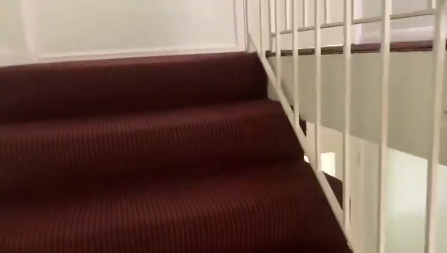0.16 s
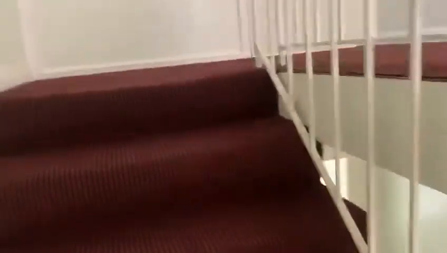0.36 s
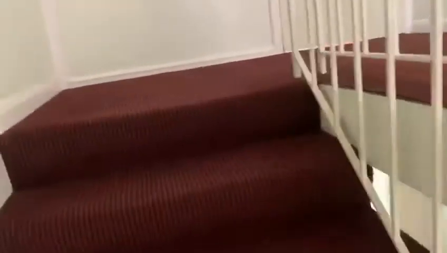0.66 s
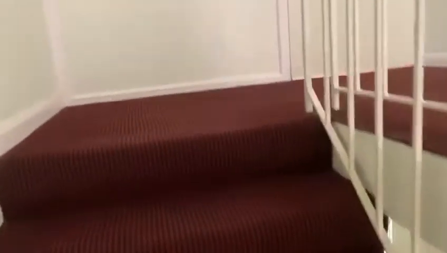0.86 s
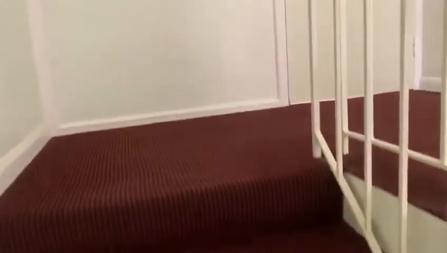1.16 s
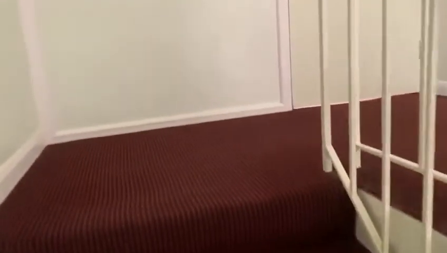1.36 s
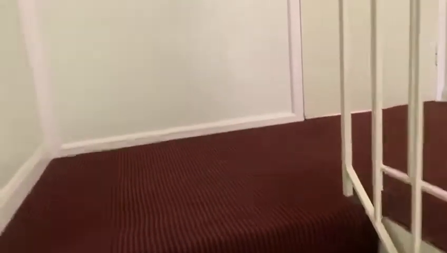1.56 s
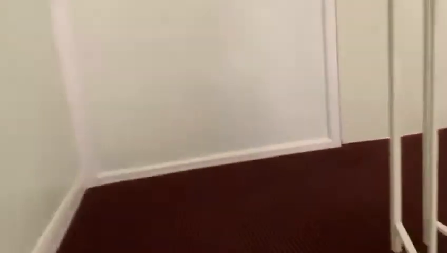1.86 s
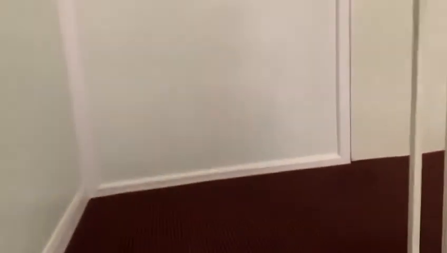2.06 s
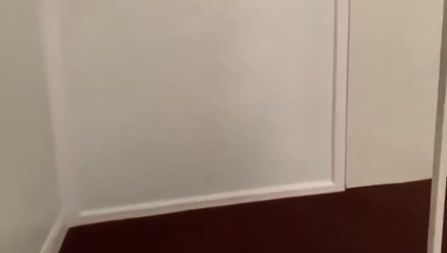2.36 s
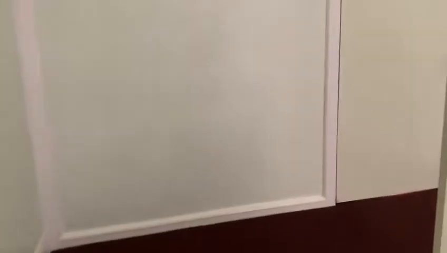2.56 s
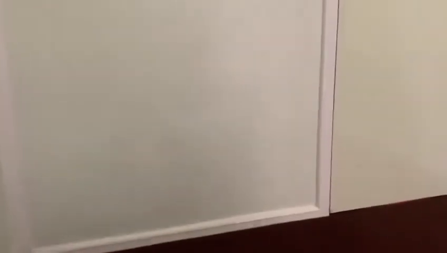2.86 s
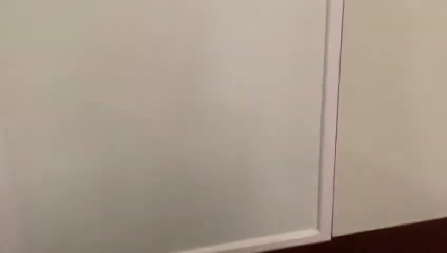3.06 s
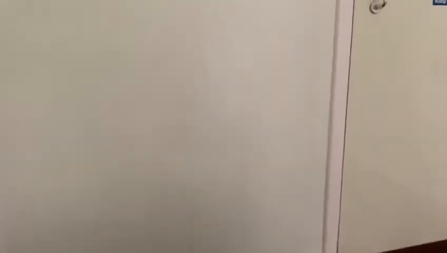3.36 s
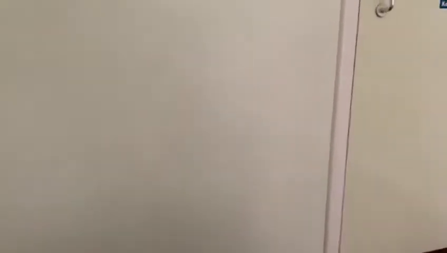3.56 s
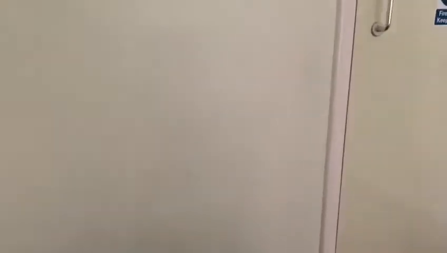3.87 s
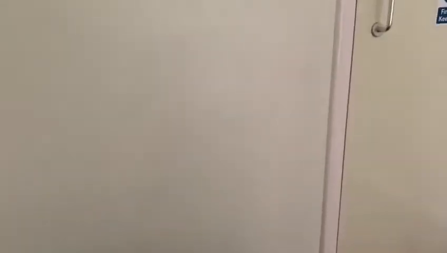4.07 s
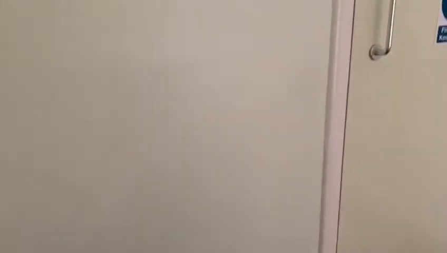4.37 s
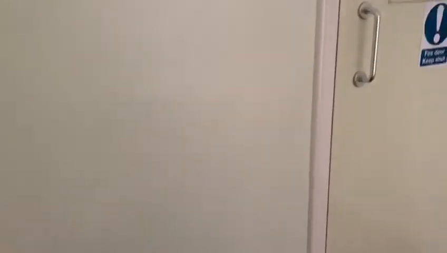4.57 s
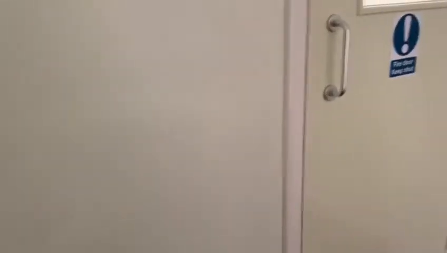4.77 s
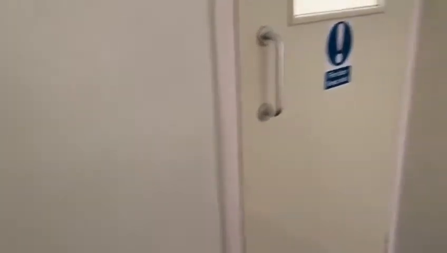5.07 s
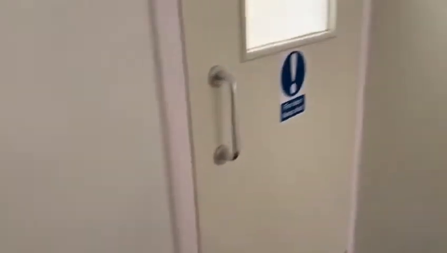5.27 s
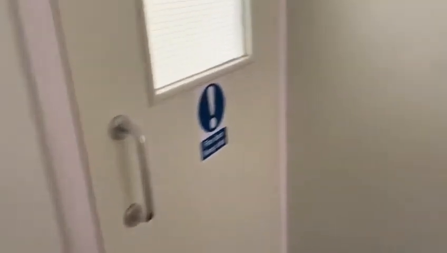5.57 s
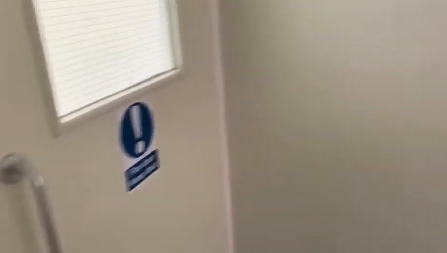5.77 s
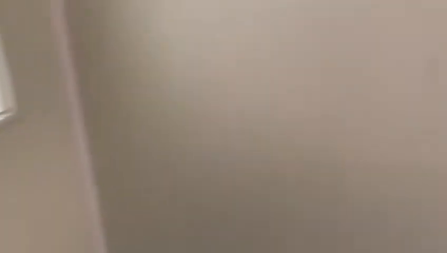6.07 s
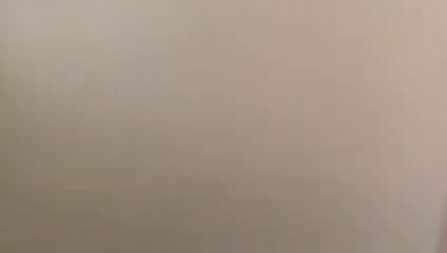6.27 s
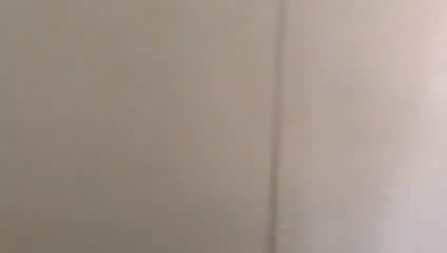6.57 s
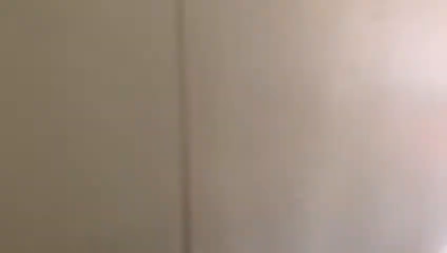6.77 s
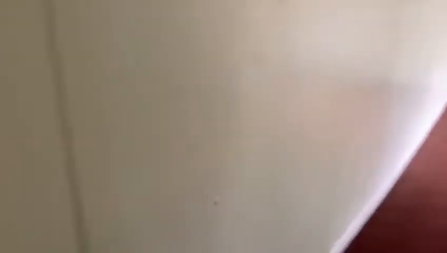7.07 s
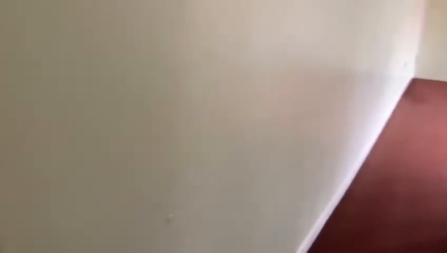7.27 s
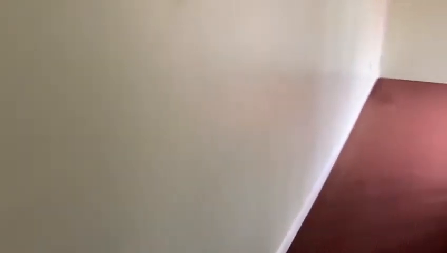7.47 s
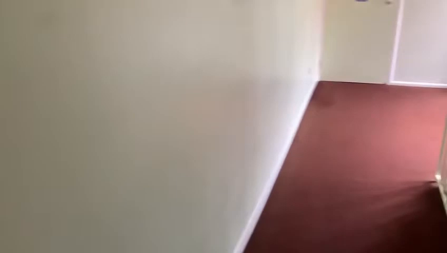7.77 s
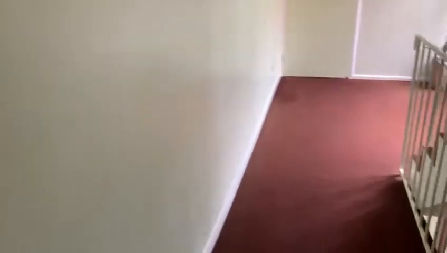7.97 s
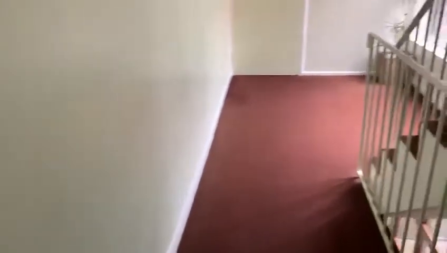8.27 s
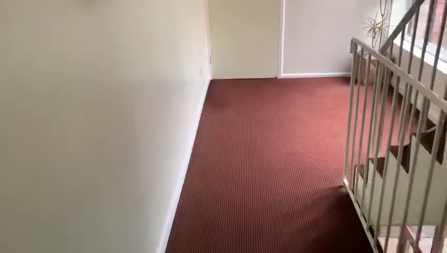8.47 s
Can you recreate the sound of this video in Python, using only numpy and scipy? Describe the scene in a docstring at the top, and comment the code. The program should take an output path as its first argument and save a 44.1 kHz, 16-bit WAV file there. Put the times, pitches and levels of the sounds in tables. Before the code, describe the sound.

In a quiet, hard-walled stairwell, dull carpeted footsteps climb the last stairs and make the flight boom low. Close to the handheld stereo microphone, clothing swishes and folds snap, with a tiny zip pull tinkling. On the landing the boom fades and softer, drier steps continue among rustles, with faint finger bumps near six seconds.

```python
"""A hard-walled stairwell, heard through two microphone ports carried in the walker's hand; it rumbles faintly.
First the last carpeted stairs: dull footfalls set the flight booming, while close by clothes swish,
folds snap taut and a zip pull tinkles. Then the feet reach the solid landing, where the boom drops away
and the knock of the soles rises against the thud. Later fingers bump the case softly, and the zip ticks again.
Blows ring decaying modes, cloth is coloured random grains, and the walls add a decaying noise tail."""
import sys
import numpy as np
from scipy import signal
from scipy.fft import rfft, irfft, next_fast_len
from scipy.io import wavfile
from scipy.ndimage import map_coordinates

SR = 44100
rng = np.random.default_rng(int(sys.argv[2]) if len(sys.argv) > 2 else 0)


def bounce(signal):
    """Save signal as a 16-bit WAV file at the path given by the first command-line argument."""
    frames = np.transpose(np.atleast_2d(signal))
    limited = np.clip(frames, -1, 1)
    pcm = np.round(limited * 32767).astype(np.int16)
    wavfile.write(sys.argv[1], SR, pcm)


N = 380583
TIME = np.arange(N) / SR
SPAN = TIME[:SR // 2]   # the half second that one event may take
SPAN_MIDDLE_S = SPAN.mean()
SIDES = np.array([[1], [-1]])   # left, right


def from_db(db):
    """Decibels to gain."""
    return 10 ** (np.asarray(db) / 20)


def rms_one(x):
    """Scale to unit power."""
    return x / np.sqrt(np.mean(x ** 2) + 1e-20)


def add(out, sound, s):
    """Mix a sound in from time s on."""
    start = max(int(s * SR), 0)
    out[:, start:start + sound.shape[-1]] += sound[..., :N - start]


def bins(size):
    """Spectrum frequencies in Hz, raised by 1 Hz so that their logarithm exists."""
    return np.arange(size // 2 + 1) * SR / size + 1


def at_hz(points, hz):
    """Read a two-column table over log frequency."""
    table_hz, value = np.transpose(points)
    return np.interp(np.log(hz), np.log(table_hz), value)


def colour(x, spectrum):
    """Give white sound a spectrum and keep its power."""
    size = x.shape[-1]
    gain = rms_one(from_db(at_hz(spectrum, bins(size))))
    return irfft(rfft(x) * gain, size)


def wander(along):
    """Smooth chance with a spread near one and a new value for each unit along the axis."""
    knots = np.clip(rng.standard_normal(512), -2, 2)
    return np.interp(along, np.arange(len(knots)), knots)


def grains(per_s, spread_db):
    """Random tiny slips of uneven size through one event; unit power."""
    slips = rng.random(len(SPAN)) < per_s / SR
    size = np.clip(rng.standard_normal(len(SPAN)), -2, 2)
    sign = rng.choice([-1, 1], len(SPAN))
    return rms_one(slips * sign * from_db(spread_db * size))


def burst(rise_s, fall_s):
    """An envelope that swells quickly and dies away."""
    rise = np.minimum(SPAN / rise_s, 1) ** 2
    return rise * np.exp(-np.maximum(SPAN - rise_s, 0) / fall_s)


def strike(times, levels_db, modes):
    """Blows ring a body's damped modes, each with a random strength of its own."""
    out = np.zeros(N)
    for hz, db, t60_s in modes:
        clicks = np.full(N, 1e-18)
        clicks[(times * SR).astype(int)] = from_db(levels_db + db + rng.standard_normal(len(times)))
        radius = np.exp(-np.log(1000) / (t60_s * SR))
        angle = 2 * np.pi * hz / SR
        resonator = [1, -2 * radius * np.cos(angle), radius * radius]
        out += signal.lfilter([0, np.sin(angle)], resonator, clicks)
    return out


def ports(x, lead_s, pan_db):
    """A near sound reaches the left port lead_s before the right, and pan_db louder there."""
    turn = np.exp(1j * np.pi * bins(len(x)) * lead_s * SIDES)
    return irfft(rfft(x) * turn, len(x)) * from_db(.5 * pan_db * SIDES)


# likeness of the two ports in sound from all sides: frequency_hz, correlation (none)
PORT_LIKENESS = [(60, 0.96), (130, 0.76), (260, 0.79), (500, 0.24), (1000, 0.02)]


def diffuse(size):
    """White sound from all sides: both ports agree only in the bass."""
    alike = np.clip(at_hz(PORT_LIKENESS, bins(size)), -1, 1)
    mid, side = rfft(rng.standard_normal((2, size)))
    return irfft(np.sqrt((1 + alike) / 2) * mid + np.sqrt((1 - alike) / 2) * side * SIDES, size)


# echo of the stairwell: frequency_hz, t60_s
STAIRWELL_DECAY = [(100, 0.94), (300, 0.5), (700, 0.16), (3000, 0.41), (10000, 0.2)]


def stairwell(x, room_db, build_s=0.0016):
    """Add the echo tail of the hard walls, which dies at its own rate in each octave."""
    noise, t, tail = rfft(diffuse(SR)), TIME[:SR], 0
    octave = np.clip(np.log2(bins(SR)), 6, 14)
    for k in range(6, 15):   # bands centred on 2 ** k Hz
        band = irfft(noise * np.maximum(1 - abs(octave - k), 0), SR)
        tail = tail + band * np.exp(-np.log(1000) * t / at_hz(STAIRWELL_DECAY, 2 ** k))
    build = 1 - np.exp(-t / build_s)
    tail = rms_one(tail * build) / np.sqrt(SR)
    return x + from_db(room_db) * signal.fftconvolve(x, tail, axes=1)[:, :N]


# background, before layer gains: time_s, rumble_db, hollow_murmur_db
BACKGROUND = [(0, -48, -81), (0.5, -58, -66), (2.75, -57.5, -66.5), (3.2, -63, -65.5), (4.3, -59, -67.5),
              (5.0, -59, -66.5), (5.45, -60, -62), (5.75, -61.5, -67.5), (6.7, -60, -68.5),
              (7.0, -63, -62.5), (7.4, -64, -69.5), (8.1, -71, -67), (8.6, -55, -65)]
# colours of rumble, murmur and faint steady hiss: frequency_hz, relative_level_db (per Hz)
RUMBLE_COLOUR = [(15, -26), (30, -4), (45, 1.5), (60, 5.5), (80, 6), (115, -6.5), (170, -17.5),
                 (400, -54.5)]
HOLLOW_COLOUR = [(80, -19), (150, -0.5), (400, -3), (620, -9.5), (1500, -13.5), (4000, -23.5)]
HISS_COLOUR = [(300, 2), (2000, -5), (5000, -12.5), (11000, -26)]


def building(rumble_db=-3.0, hollow_db=0.0, waver_db=2.1, wavers_per_s=14, hiss_db=-78):
    """Low rumble, a hollow murmur that swells and wavers, and a faint hiss surround the microphone."""
    s, rumble, hollow = np.transpose(BACKGROUND)
    size = next_fast_len(N, real=True)
    rumble_level = np.interp(TIME, s, rumble) + rumble_db
    hollow_level = np.interp(TIME, s, hollow) + hollow_db + waver_db * wander(TIME * wavers_per_s)
    layers = [(rumble_level, RUMBLE_COLOUR), (hollow_level, HOLLOW_COLOUR), (hiss_db, HISS_COLOUR)]
    return sum(from_db(db) * colour(diffuse(size), spectrum)[:, :N] for db, spectrum in layers)


# hand shifting on the microphone: start_s, level_db (before bump gain and modes)
HAND_BUMPS = [(4.319, -59), (6.018, -55.5), (6.116, -59)]
# ringing of the gripped case: pitch_hz, level_db, t60_s
GRIP_MODES = [(52.7, 10, 0.26), (88, 13.5, 0.17)]


def handling(bump_db=-1):
    """Fingers shift on the case and ring its low modes, softened by a low-pass filter."""
    s, db = np.transpose(HAND_BUMPS)
    low_pass = signal.butter(2, 220, fs=SR, output="sos")
    return signal.sosfilt(low_pass, strike(s, db + bump_db, GRIP_MODES))


# treble of cloth and zip ticks: frequency_hz, relative_level_db (per Hz)
TREBLE_COLOUR = [(2500, -25.5), (4700, -7), (6300, 6), (7800, -2.5), (9200, 4), (11000, -2)]
# ticks of the zip pull on its slider: start_s, level_db (before tap and tick gains)
ZIP_TICKS = [(0.626, -50), (0.975, -52.5), (1.2024, -28.5), (2.39, -41.5), (7.272, -49), (7.358, -58)]
# ringing of the zip pull: pitch_hz, level_db, t60_s
ZIP_MODES = [(5800, -9, .03), (8926, -21, .25), (9388, -8, .22), (9350, 1, .03), (10480, -9, .25),
             (10530, -5, .04)]


def zip_pull(tap_db=2, tick_db=-5):
    """A small metal tab, louder in the right port, ticks and rings high and briefly."""
    s, db = np.transpose(ZIP_TICKS)
    out = ports(strike(s, db + tap_db, ZIP_MODES), lead_s=0.000314, pan_db=-6.0)
    for start_s, level_db in ZIP_TICKS:
        tick = burst(0.00028, 0.0022) * colour(grains(7100, 3), TREBLE_COLOUR)
        add(out, from_db(level_db + tick_db) * tick, start_s)
    return stairwell(out, room_db=-9)


def crackle(per_s, size_db):
    """Cloth snags many times a second and lets go with a push that fades in a millisecond or two."""
    snags = (rng.random(len(SPAN)) < per_s / SR) * rng.uniform(0.15, 1, len(SPAN))
    pushes = signal.lfilter([1], [1, -np.exp(-1 / (0.0017 * SR))], snags)
    return rms_one(1 + from_db(size_db) * pushes)


# colour of the moving cloth: time_s, fold_pitch_hz, treble_over_body_db
FOLD_TONE = [(0.3, 2400, 0), (0.65, 2960, 1.5), (1.2, 2500, 4.5), (1.7, 2230, 3), (2.0, 2100, 2),
             (2.55, 2120, 0), (3.05, 2400, -3.5), (3.33, 3280, 7.5), (3.8, 2500, 0), (4.05, 2400, -5),
             (4.4, 2200, 2.5), (4.9, 2870, 1), (5.3, 2420, -1.5), (5.951, 2860, -7.5), (6.4, 2400, 1),
             (6.55, 2050, -4), (6.85, 2980, -6), (7.15, 3000, -5), (7.5, 2050, -8), (7.8, 2250, 0),
             (8.45, 2250, 8)]


def fold_at(s, db):
    """Body level, treble level and pitch of a fold that moves at time s."""
    times, hz, treble_db = np.transpose(FOLD_TONE)
    return db, db + np.interp(s, times, treble_db), np.interp(s, times, hz)


# effort of walking, the base level of small cloth movements: time_s, level_db
WALKING_EFFORT = [(0, -73), (0.4, -72), (1.4, -59), (2.4, -59), (2.8, -61), (4.0, -72), (5.0, -68),
                  (6.68, -73.5), (7.5, -66.5), (8.0, -67.5), (8.6, -70)]
FIDGET_SPREAD_DB = 2.5


def fidgets(every_s, db, length_s):
    """Small cloth movements at uneven times whose level follows the effort: rows of (s, dB, length s)."""
    late, size = rng.standard_normal((96, 2)).T
    times = every_s * (np.arange(len(late)) + .5 + late / 5)
    levels = np.interp(times, *np.transpose(WALKING_EFFORT)) + db + FIDGET_SPREAD_DB * size
    return [(s, level, length_s) for s, level in zip(times, levels) if SPAN_MIDDLE_S < s < N / SR]


def shifting(x, ripple_db, ripple_hz=130, changes_per_s=26):
    """Random ripple over pitch and time, with low peaks and deep notches, keeps the cloth's colour changing."""
    hz, s, frames = signal.stft(x, SR, nperseg=512)
    field = np.clip(rng.standard_normal((256, 256)), -2.5, 1.3)   # the lopsided limits favour notches
    places = np.meshgrid(hz / ripple_hz, s * changes_per_s, indexing="ij")
    ripple = map_coordinates(field, places, order=1, mode="mirror")
    return signal.istft(frames * rms_one(from_db(ripple_db * ripple)), SR)[1][:, :N]


# body of the cloth: multiple_of_fold_pitch (none), relative_level_db (per Hz)
CLOTH_COLOUR = [(.06, -33), (.25, -13.5), (.47, -4), (.72, 2.5), (0.999, 5.5), (1.329, 1), (1.67, 0),
                (2.199, -1.5), (2.9, -8), (4.201, -10)]


def cloth(envelope, body_db, hiss_db, hz, crumple_db, per_s, grain_db, lead_s=0.00013):
    """Threads slip in a dense stream that catches and lets go; each fold has its own colour and place."""
    force = envelope * rms_one(from_db(crumple_db * wander(SPAN * 200)))
    body = colour(force * grains(per_s, grain_db), np.array(CLOTH_COLOUR) * [hz, 1])
    hiss = colour(force * grains(per_s, grain_db), TREBLE_COLOUR)
    lead_chance, pan_chance = rng.standard_normal(2)
    mixed = from_db(body_db) * body + from_db(hiss_db) * hiss
    return ports(mixed, lead_s + 0.0001 * lead_chance, 1.5 * pan_chance)


# a leg or arm swings past, close to the microphone: middle_s, level_db (before layer gains), half_length_s
LIMB_SWINGS = [(0.32, -72, 0.043), (1.157, -56.5, 0.053), (1.298, -61.5, 0.057), (2.191, -48.5, 0.055),
               (2.403, -50, 0.033), (3.091, -51.5, 0.069), (4.04, -51.5, 0.054), (4.494, -53, 0.037),
               (4.599, -58, 0.05), (5.266, -60.5, 0.039), (5.843, -56.5, 0.062), (6.396, -60.5, 0.026),
               (6.533, -58.5, 0.027), (6.841, -60.5, 0.024), (7.077, -64.5, 0.063), (7.746, -54, 0.053),
               (8.17, -60, 0.035), (8.393, -57.5, 0.036), (8.516, -58, 0.059)]
# small strokes between the swings; level relative to the effort
RUSTLE_EVERY_S, RUSTLE_HALF_S, RUSTLE_DB = .17, 0.049, -3.5
# brush at each footstep row: body relative to its weight, treble relative to body, both before layer gains
SCUFF_DB, SCUFF_HISS_DB, SCUFF_HZ, SCUFF_LATE_S, SCUFF_HALF_S = -16.5, -15, 1560, .025, 0.038


def swishes(body_db=5.0, hiss_db=3.2):
    """Sleeves and trouser legs brush past and soles brush the pile, swelling and fading."""
    out = np.zeros((2, N))
    strokes = [*LIMB_SWINGS, *fidgets(RUSTLE_EVERY_S, RUSTLE_DB, RUSTLE_HALF_S)]
    rubs = [(s, *fold_at(s, db), half_s) for s, db, half_s in strokes]
    scuffs = []
    for s, weight, _, _ in FOOTSTEPS:
        if s > SPAN_MIDDLE_S:   # an earlier step leaves no room for the swell
            db = weight + SCUFF_DB
            scuffs.append((s + SCUFF_LATE_S, db, db + SCUFF_HISS_DB, SCUFF_HZ, SCUFF_HALF_S))
    for s, body, hiss, hz, half_s in scuffs + rubs:
        swell = np.exp(-.5 * ((SPAN - SPAN_MIDDLE_S) / half_s) ** 2) * crackle(per_s=130, size_db=11.5)
        rub = cloth(swell, body + body_db, hiss + hiss_db, hz, crumple_db=3.5, per_s=1200, grain_db=5)
        add(out, rub, s - SPAN_MIDDLE_S)
    return stairwell(shifting(out, ripple_db=5), room_db=-0.5)


# folds snapping taut near the microphone: start_s, crack_db, rub_db, rub_length_s, treble_over_body_db
FOLD_SNAPS = [(0.305, -52, -64, 0.014, -6), (.503, -51, -69, 0.01, 4), (0.624, -55, -57, 0.023, 10),
              (0.683, -44, -61, 0.01, 12.5), (0.776, -55, -63, 0.013, 10), (1.091, -55, -54, 0.02, 4.5),
              (1.443, -52, -51, .015, 10), (1.557, -42, -45, 0.012, 11), (1.622, -27, -38, 0.013, 8.5),
              (1.71, -21.5, -31, 0.016, 3), (2.004, -38, -51, 0.019, -4), (2.094, -45, -49.5, 0.071, 4),
              (2.172, -36, -45, 0.035, 11), (2.2, -37, -39, 0.014, 2), (2.332, -55, -50, 0.035, 9),
              (2.45, -29, -47, 0.018, 1), (2.562, -33, -31.5, 0.039, 2.5), (3.338, -19.5, -48, 0.005, -5),
              (3.345, -31, -56, 0.011, -12.5), (3.67, -39, -52, 0.018, -11),
              (3.772, -27, -39.5, 0.015, -0.5), (4.211, -44, -52, 0.033, 10), (4.407, -58, -52, 0.045, 8.5),
              (4.905, -53, -51, .035, -10), (5.678, -45, -50.5, 0.019, 1.5), (5.871, -30, -45, 0.082, 0),
              (6.016, -31, -38.5, 0.042, -4.5), (6.747, -55, -66, 0.043, 8.5), (7.38, -56, -53, .035, 4),
              (7.459, -39, -47, 0.022, -5.5), (7.553, -45, -45, 0.047, -12),
              (7.798, -39, -40.5, 0.044, 4.5), (8.094, -38, -58, 0.0089, -12), (8.109, -41, -48, 0.035, 1),
              (8.427, -35, -50, 0.0094, 3), (8.475, -35, -54, 0.02, -2)]
# small snaps between the large ones; level relative to the effort
CREASE_EVERY_S, CREASE_FALL_S, CREASE_DB = 0.12, 0.005, -2


def snaps(slide_db=-10, slide_s=0.016, crack_s=0.0011, crease_crack_db=7):
    """A fold slides briefly, pulls taut with a short crack, then rubs on in a run of small bucklings."""
    out = np.zeros((2, N))
    since = SPAN - SPAN_MIDDLE_S
    slide = from_db(slide_db) * np.exp(-abs(since / slide_s))
    crack = (since >= 0) * np.exp(-abs(since / crack_s))
    creases = []
    for s, db, rub_s in fidgets(CREASE_EVERY_S, CREASE_DB, CREASE_FALL_S):
        treble_db = fold_at(s, db)[1] - db
        creases.append((s, db + crease_crack_db, db, rub_s, treble_db))
    for s, crack_db, db, rub_s, treble_db in [*FOLD_SNAPS, *creases]:
        rub = np.where(since < 0, slide, np.exp(-(since / rub_s) ** 2))
        force = rub * crackle(per_s=140, size_db=7.5) + from_db(crack_db - db) * crack
        hz = fold_at(s, db)[2]
        snap = cloth(force, db, db + treble_db, hz, crumple_db=1.8, per_s=12000, grain_db=4.0)
        add(out, snap, s - SPAN_MIDDLE_S)
    return stairwell(shifting(out, ripple_db=7.5), room_db=-1.5)


# footsteps below the microphone; the last three rows are soft mid-pitched knocks, probably the body
# of cloth snaps: start_s, weight_db, flight_boom_db, tread_pitch_hz (levels before layer gains)
FOOTSTEPS = [(0.056, -60.5, -46, 94), (0.888, -47, -35, 109), (1.525, -51, -40, 103),
             (2.199, -38, -38, 225.4), (2.268, -42, -36, 117), (2.85, -51, -67, 100),
             (3.502, -45, -53, 198), (4.199, -43.5, -59, 215), (5.046, -47, -67, 169),
             (5.08, -52, -68, 239), (6.56, -63, -74, 270), (7.798, -53, -74, 522), (8.11, -58, -78, 415),
             (8.42, -60, -64, 476)]
# ringing of the stair flight: pitch_hz, level_db (before the band filter), t60_s
FLIGHT_MODES = [(62.46, -4.5, 1.3), (75.8, -23, 0.4), (114, -16.5, 1.3)]
# colours of the carpet's thud and the sole's knock: frequency_hz, relative_level_db (per Hz)
THUD_COLOUR = [(40, -19), (80, 3.5), (120, 3.5), (210, 4), (280, -0.5), (400, -40), (900, -49)]
KNOCK_COLOUR = [(150, -37), (320, 1.5), (480, 3.5), (700, -4), (1300, -12.5), (3000, -32)]
# feet pass from the ringing flight to the solid landing between these times
LEAVE_FLIGHT_S, ON_LANDING_S = 2.2, 2.85
FLIGHT_KNOCK_DB, LANDING_KNOCK_DB = -19, -8.5   # knock of the sole, relative to a step's weight


def footfalls(thud_db=-9, thud_fall_s=0.05, tread_db=2.5, tread_fall_s=0.011):
    """Carpet softens each blow to a thud; the tread rings briefly and the weight behind it sways the flight."""
    out = np.zeros((2, N))
    for s, weight, _, hz in FOOTSTEPS:
        knock_db = np.interp(s, [LEAVE_FLIGHT_S, ON_LANDING_S], [FLIGHT_KNOCK_DB, LANDING_KNOCK_DB])
        pad = burst(0.016, thud_fall_s) * colour(grains(8000, 1.7), THUD_COLOUR)
        tread = burst(0.011, tread_fall_s) * np.sin(2 * np.pi * hz * SPAN)
        sole = burst(0.022, 0.032) * colour(grains(5000, 7.9), KNOCK_COLOUR)
        step = from_db(thud_db) * pad + from_db(tread_db) * tread + from_db(knock_db) * sole
        add(out, from_db(weight) * step, s - .002)
    s, _, boom_db, _ = np.transpose(FOOTSTEPS)
    boom_band = signal.butter(2, [48, 120], "band", fs=SR, output="sos")
    flight = signal.sosfilt(boom_band, strike(s, boom_db, FLIGHT_MODES))
    return stairwell(out, room_db=-4.0) + flight


def scene():
    """The building all around, clothes close by, footsteps below."""
    return building() + handling() + zip_pull() + swishes() + snaps() + footfalls()


# colour difference of the two microphone ports: frequency_hz, left_minus_right_db
PORT_COLOUR = [(60, -2.5), (500, -1), (3500, 0.9), (9000, -1.5)]
CUTOFF_HZ = 11200


def record(dry):
    """The two microphone ports differ in colour; the top is cut steeply."""
    size = next_fast_len(N, real=True)
    balance = from_db(.5 * at_hz(PORT_COLOUR, bins(size)) * SIDES)
    ported = irfft(rfft(dry, size) * balance, size)[:, :N]
    top_cut = signal.ellip(10, .2, 70, CUTOFF_HZ, fs=SR, output="sos")
    return signal.sosfilt(top_cut, ported)


dry = scene()
out = record(dry)
bounce(out)
```